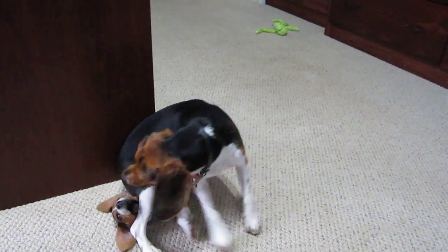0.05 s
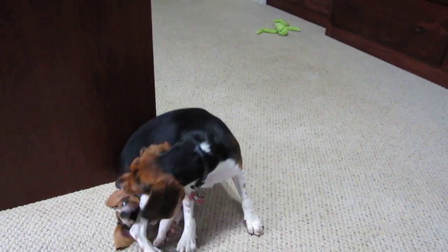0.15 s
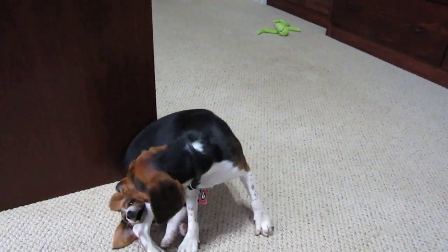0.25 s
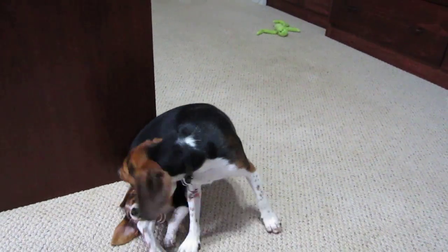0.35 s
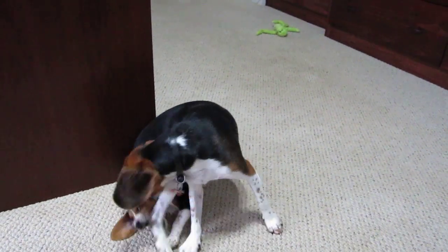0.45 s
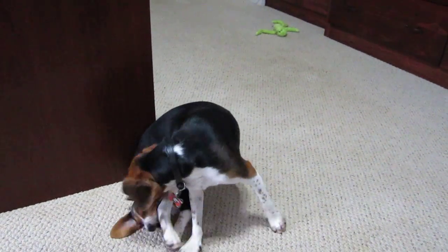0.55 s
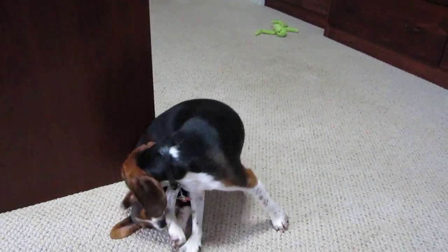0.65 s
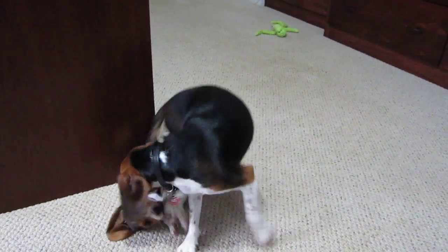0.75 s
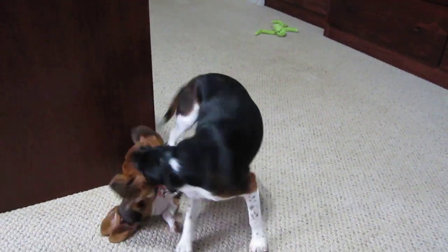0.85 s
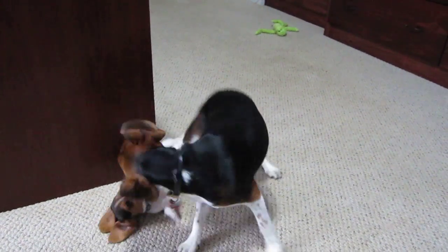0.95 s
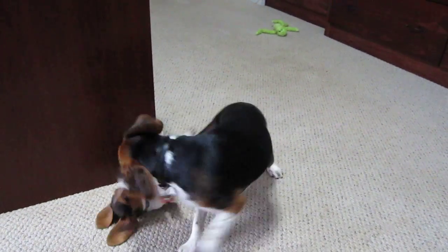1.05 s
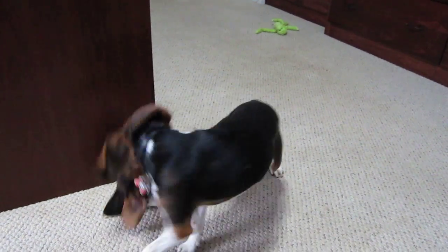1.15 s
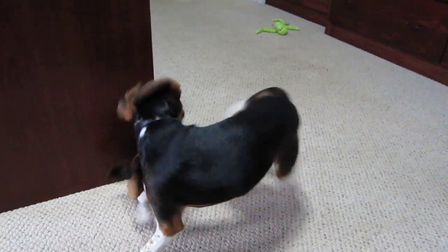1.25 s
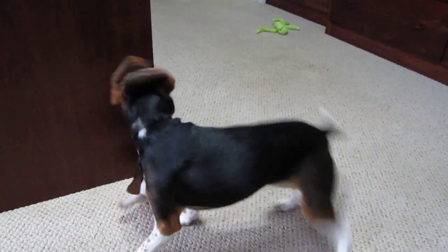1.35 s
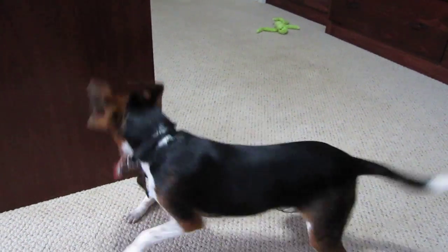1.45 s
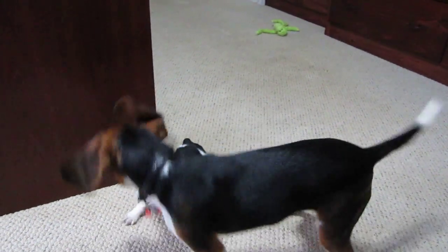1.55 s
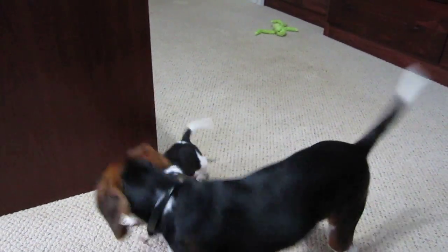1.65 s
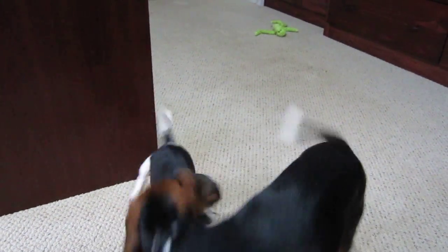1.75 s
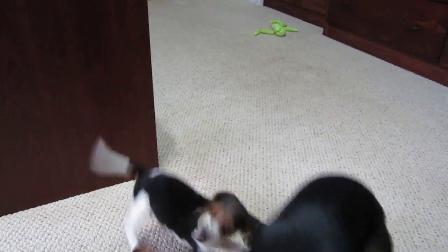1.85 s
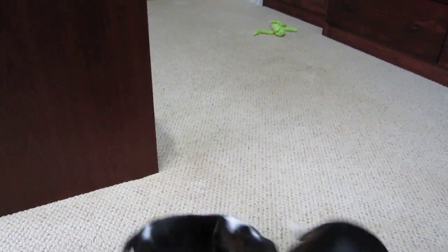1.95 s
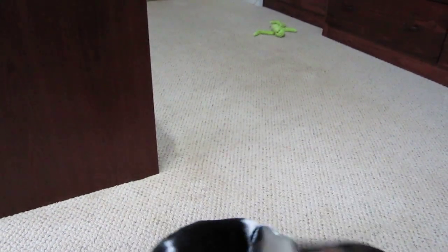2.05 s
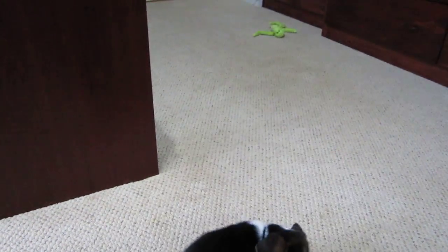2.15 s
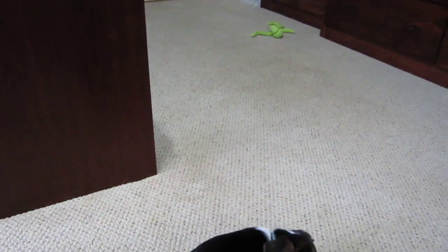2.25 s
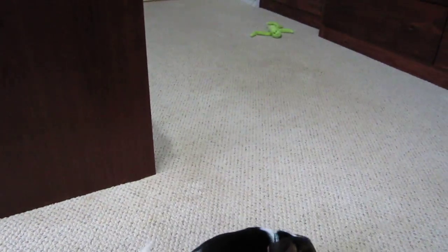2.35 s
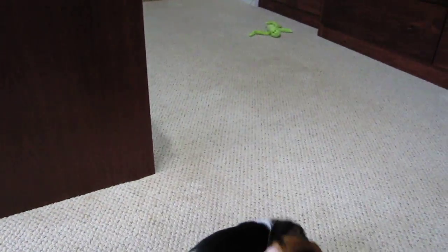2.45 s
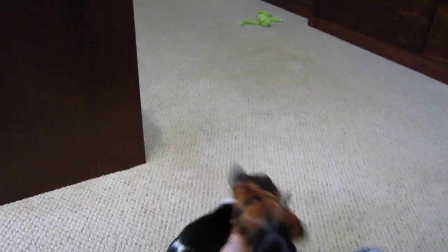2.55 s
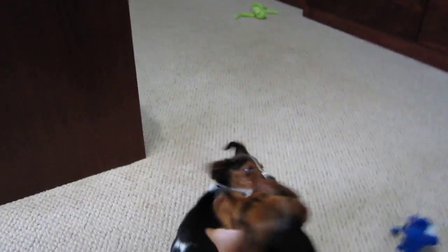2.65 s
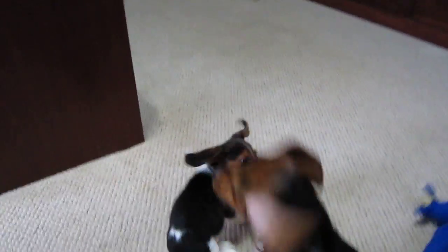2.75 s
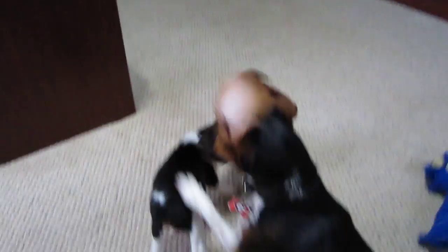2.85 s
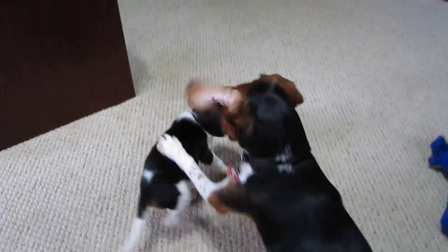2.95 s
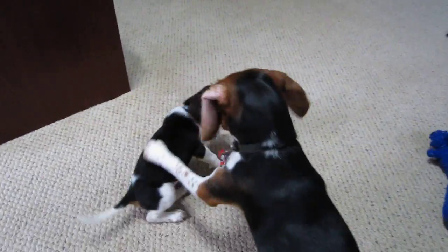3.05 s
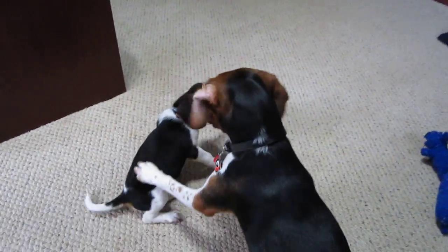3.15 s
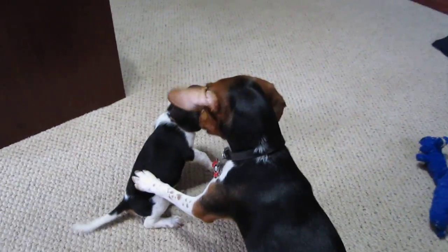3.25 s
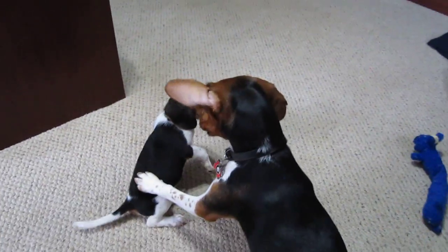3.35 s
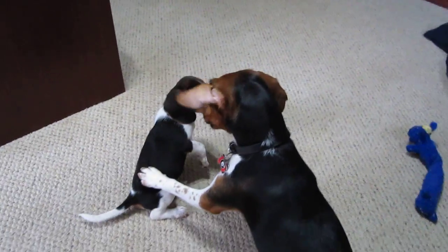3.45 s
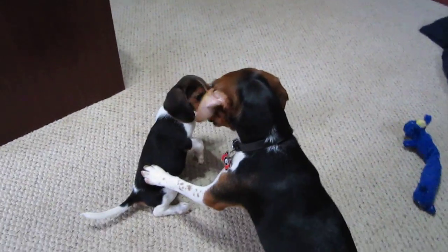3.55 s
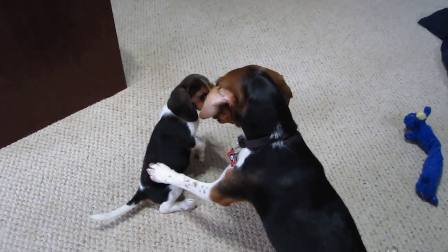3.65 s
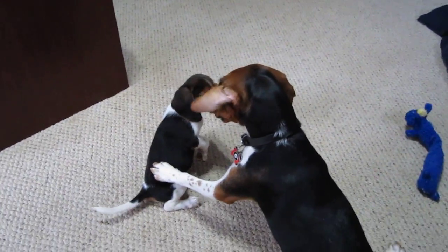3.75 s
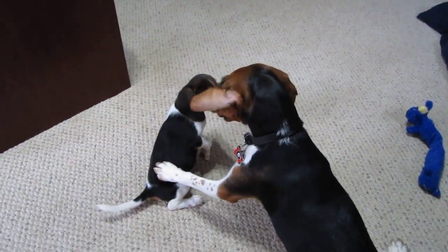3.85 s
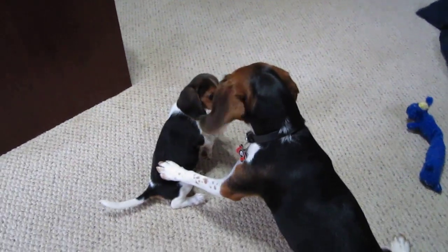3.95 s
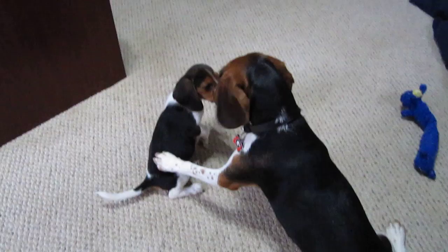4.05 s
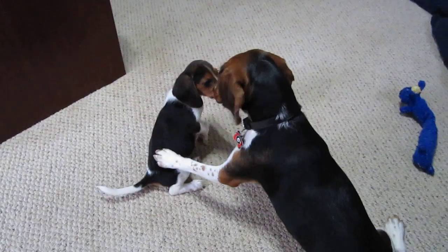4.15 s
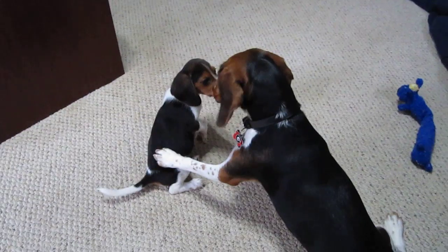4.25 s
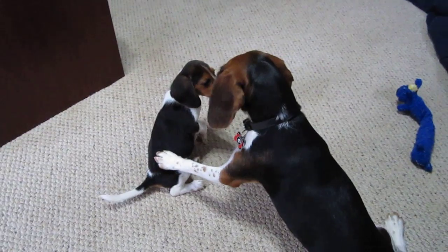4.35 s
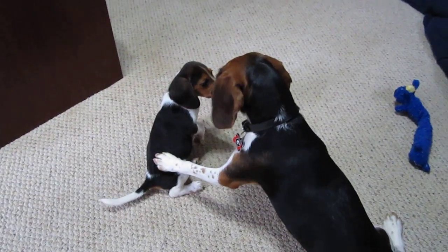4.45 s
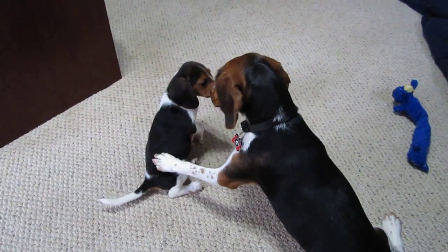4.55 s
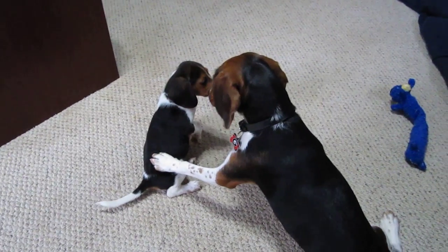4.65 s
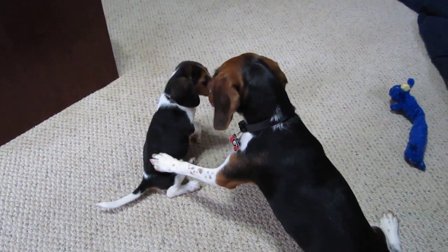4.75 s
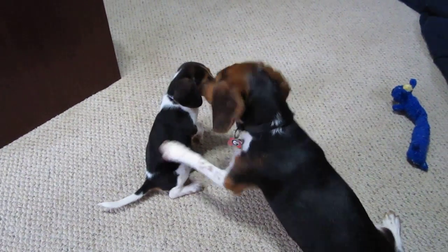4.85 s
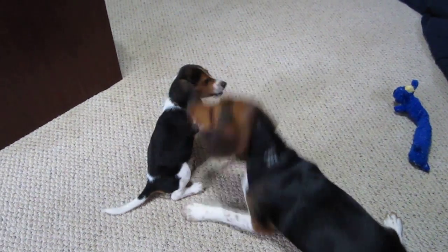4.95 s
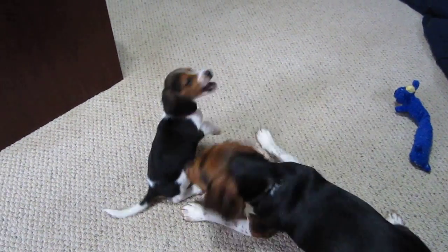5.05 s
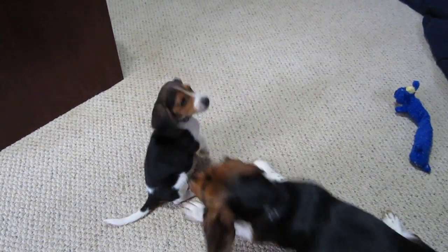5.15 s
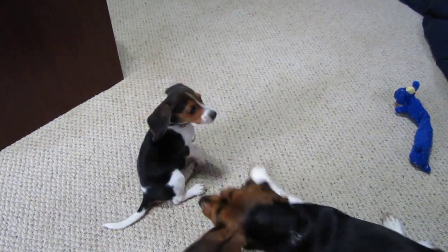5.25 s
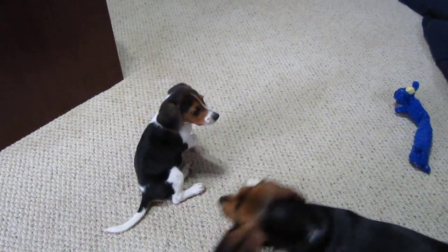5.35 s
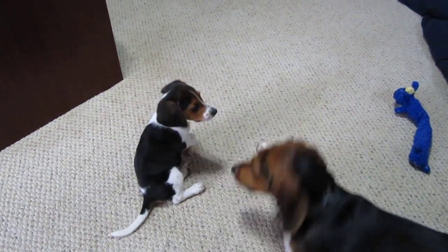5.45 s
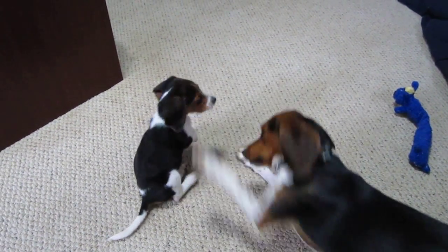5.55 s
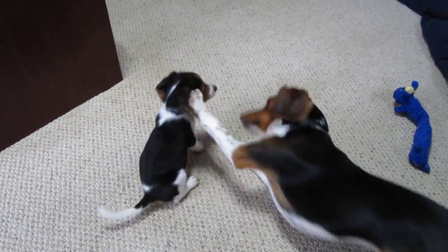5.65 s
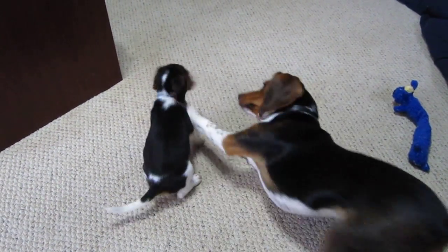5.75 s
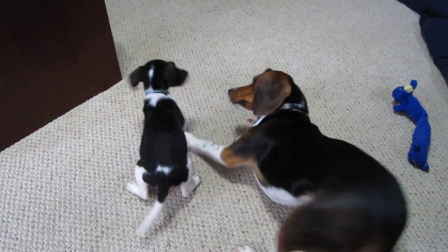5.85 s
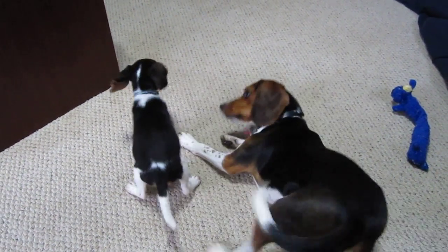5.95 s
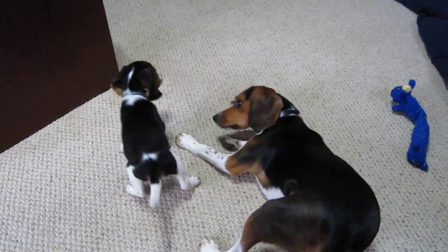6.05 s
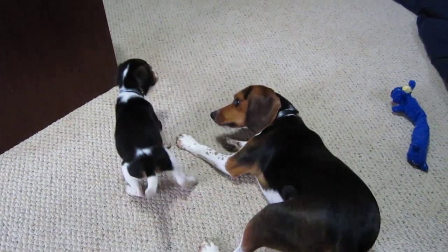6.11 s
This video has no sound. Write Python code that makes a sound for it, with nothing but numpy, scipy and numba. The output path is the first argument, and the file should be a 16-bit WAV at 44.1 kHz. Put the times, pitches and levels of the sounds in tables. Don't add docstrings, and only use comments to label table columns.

```python
import sys
import numpy as np
from scipy import signal
from scipy.fft import rfft, irfft, next_fast_len
from scipy.io import wavfile
from scipy.ndimage import uniform_filter1d, map_coordinates
from numba import njit

SR = 44100
rng = np.random.default_rng(int(sys.argv[2]) if len(sys.argv) > 2 else 0)


def int16_out(signal):
    q = np.round(np.clip(np.atleast_2d(signal).T, -1, 1) * 32767)
    wavfile.write(sys.argv[1], SR, q.astype(np.int16))


def rack_gain(trim_db):
    fader = np.asarray(trim_db, float)
    return 10 ** (fader / 20)


N = 272538
TOP_HZ = 16300
FULL_DB = -13


def even_out(x, span_s=0.045):
    return x / np.sqrt(np.abs(uniform_filter1d(x ** 2, int(span_s * SR))) + 1e-12)


def along(points, hz):
    f, v = np.transpose(points)
    return np.interp(np.log(hz + 1), np.log(f + 1), v)


def played(rows):
    s, *cols = np.transpose(rows)
    t = np.arange(max(round(s[0] * SR), 0), min(round(s[-1] * SR), N)) / SR
    fade = np.clip(np.minimum(t - s[0], s[-1] - t) / .002, 0, 1)
    curves = [uniform_filter1d(np.interp(t, s, c), size=130) for c in cols]
    return round(t[0] * SR), fade, curves


def wobble(n, rate):
    knots = rng.standard_normal(int(n * rate / SR) + 4)
    return map_coordinates(knots, [np.arange(n) * rate / SR])


def noise(n, spectrum):
    m = next_fast_len(n + 2048)
    colour = rack_gain(along(spectrum, np.fft.rfftfreq(m, 1 / SR)))
    x = irfft(rfft(rng.standard_normal(m)) * colour, m)[:n]
    return x / x.std()


def mix_in(out, at, x):
    out[at:at + len(x)] += x[:len(out) - at]


def swell(peak, rise, fall, db):
    low_db = db - 30
    at, fade, (db,) = played([(peak - abs(rise), low_db), (peak, db), (peak + abs(fall), low_db)])
    return at, fade * rack_gain(db)


def swells(rows):
    out = np.zeros(N)
    for row in rows:
        mix_in(out, *swell(*row))
    return out


@njit
def resonate(x, turn, radius):
    y = np.zeros(len(x))
    for i in range(2, len(x)):
        y[i] = x[i] - x[i - 2] + 2 * radius * turn[i] * y[i - 1] - radius * radius * y[i - 2]
    return y


def formant(x, hz, width_hz):
    turn = np.cos(2 * np.pi * hz / SR) * np.ones(len(x))
    radius = np.exp(-np.pi * width_hz / SR)
    for _ in range(3):
        x = resonate(x, turn, radius)
    return even_out(x)


def throat(source, *modes):
    return sum(rack_gain(db) * formant(source, hz, width_hz) for hz, width_hz, db in modes)


def folds(n, rate, jitter, scatter_db, air):
    cycle = np.cumsum(rate * (1 + jitter * wobble(n, 120))) / SR
    clap = np.diff(np.floor(cycle), prepend=0) * rack_gain(scatter_db * wobble(n, 150))
    puff = np.exp(-2.5 * (cycle % 1)) * rng.standard_normal(n)
    return even_out(clap, 0.24) + air * even_out(puff)


# frequency in Hz, level in dB per Hz.
HISS_COLOUR = [(15, -28), (25, 3.5), (416, -7.5), (863, -8.5), (1160, -10), (1650, -13.5), (8590, -24),
               (16000, -40)]
# start in seconds, room tone level in dB.
GAIN_DROPS = [(0, -57), (2.249, -61.5), (2.7, -65.5), (5.398, -69.5)]


def room_tone():
    creep_db_per_s = 4.5
    s, db = np.transpose(GAIN_DROPS)
    t = np.arange(N) / SR
    last = np.maximum(np.searchsorted(s, t, "right") - 1, 0)
    breathing_db = uniform_filter1d(db[last] + creep_db_per_s * (t - s[last]), size=3000)
    return rack_gain(breathing_db - 5.5 + 0.48 * wobble(N, 2.2)) * noise(N, HISS_COLOUR)


def patchy(x, depth_db):
    z = signal.stft(x, nperseg=512)[2]
    field = uniform_filter1d(rng.standard_normal(z.shape), size=8, axis=0)
    field = uniform_filter1d(field, size=12, axis=1)
    return signal.istft(z * rack_gain(depth_db * field / field.std()), nperseg=512)[1][:len(x)]


# peak in seconds, rise in seconds, fall in seconds,
# rub level in dB, hiss in dB over the rub.
SCUFFS = [(0, 0.061, 0.19, -49.5, -11.5), (.3, 0.44, 0.93, -55, 4), (.522, 1, 1, -43.5, -12),
          (.958, 0.088, 0.14, -48, -4.5), (1.074, 0.017, 0.23, -37, -17), (1.2, 0.43, 0.09, -61.5, -14),
          (1.399, 0.17, 0.073, -43, -10), (1.508, 0.034, 0.12, -30.5, -8), (1.57, 0.18, 0.18, -38, -19.5),
          (1.681, 0.096, 1, -49, -13), (1.83, 0.099, 0.22, -44, -17.5), (1.95, 0.17, 0.17, -48.5, 0.5),
          (2.08, 0.087, 0.11, -46, 2), (2.551, 0.096, 0.25, -60.5, 4), (4.872, 0.094, 0.38, -60.5, 1),
          (5.248, 0.045, 0.24, -42, -6), (5.926, 0.081, 0.35, -60.5, -4.5)]
# peak, rise and fall in seconds, level in dB.
FLOOR_BOOMS = [(.2, 0.88, 0.77, -57.5), (.45, 1, 0.44, -41), (.94, 0.175, 0.99, -39.5),
               (1.34, 0.052, 1, -38.5), (1.8, 0.049, 0.16, -43.5), (2.012, 0.4, 0.13, -45.5),
               (2.45, 0.88, 0.76, -71), (2.694, 0.923, 0.24, -61.5), (4.858, 0.0603, 0.28, -46.5),
               (5.4, 0.6, 1, -66.5), (5.95, 0.91, 0.23, -68)]


def scuffle():
    boom = noise(N, [(20, -14.0), (45, -12.0), (70, -2.5), (130, -4.5), (250, -17.5), (500, -90.0)])
    rub = noise(N, [(1500, -55.5), (2800, -0.5), (3500, -3.5), (4900, -1.0), (6500, -22.5), (9000, -79.0)])
    hiss = noise(N, [(3500, -58.0), (5500, 4.5), (8000, -5.5), (12000, -13.5), (16000, -22.5)])
    grains = rack_gain(2 * wobble(N, 250) + wobble(N, 40))
    rub_gain = swells((s, rise, fall, db - 9.0) for s, rise, fall, db, _ in SCUFFS)
    hiss_gain = swells((s, rise, fall, db + over_db - 5.5) for s, rise, fall, db, over_db in SCUFFS)
    drag = patchy(rub_gain * rub + hiss_gain * hiss, depth_db=5.0)
    return swells(FLOOR_BOOMS) * boom + grains * drag


# peak in seconds, fall in seconds, level in dB, mouth resonance in Hz,
# chest level in dB.
GRUNTS = [(.005, 0.096, -38.5, 980, -16), (.045, 0.17, -42, 1020, -12), (.958, 0.3, -41, 1060, -26),
          (1.062, .1, -38.5, 1187, 5), (1.08, 0.11, -31.5, 1255, 3), (1.14, 0.12, -34.5, 960, 10.5),
          (1.175, .2, -37.5, 1185, 9.5), (1.37, 1, -54, 1115, 15.5), (1.434, 0.038, -45, 1100, -14),
          (1.533, 0.11, -41.5, 1466, 6), (1.576, .1, -51, 1200, 12.5), (1.655, 0.16, -32.5, 1160, -2),
          (1.715, .14, -39, 1185, 4), (1.783, 0.19, -48, 1161, 7)]


def grunts():
    climb = .12
    out = np.zeros(N)
    for s, fall, db, hz, chest_db in GRUNTS:
        at, gain = swell(s, .028, fall, db)
        mouth_hz = hz * np.linspace(1 - climb / 2, 1 + climb, len(gain))
        claps = folds(len(gain), 105, jitter=0.13, scatter_db=2.0, air=1.7)
        chest, neck = (220, 150, chest_db), (560, 400, -4.5 + chest_db / 2)
        voice = throat(claps, chest, neck, (mouth_hz, 340, 0), (mouth_hz * 1.28, 260, -4))
        mix_in(out, at, gain * voice)
    return out


# peak, rise and fall in seconds, level in dB.
SNORTS_AND_RUSTLES = [(.01, 0.039, 0.42, -54.5), (.97, 0.28, 0.57, -46), (1.41, 0.021, 0.11, -47.5),
                      (1.495, 0.017, 0.08, -32), (1.53, 0.095, 0.12, -34), (1.575, 0.1, 0.058, -43),
                      (2.414, 0.033, 0.12, -58.5), (3.56, 0.45, 0.55, -70.5), (4.872, 0.029, 0.0315, -34.5),
                      (5.95, 0.16, 0.19, -64.5)]
# frequency in Hz, level in dB per Hz.
NOSE_COLOUR = [(290, -43), (500, -25.5), (831, -16.5), (1450, -4), (1910, -3.5), (2350, -3), (3300, -14.5),
               (5620, -23.5), (9000, -41.5), (11700, -69), (19800, -120)]
# peak in seconds, fall
# in seconds, pitch in Hz, level in dB.
WHISTLES = [(4.845, .024, 4980, -53), (4.928, .012, 13750, -65.5), (4.942, 0.015, 14300, -56),
            (5.911, 0.059, 5118, -44.5)]


def nose():
    out = swells(SNORTS_AND_RUSTLES) * rack_gain(2 + 2 * wobble(N, 90)) * noise(N, NOSE_COLOUR)
    for s, fall, hz, db in WHISTLES:
        at, gain = swell(s, 0.028, fall, db)
        n = len(gain)
        flutter = rack_gain(2.3 * wobble(n, 73))
        phase = 2 * np.pi * np.cumsum(hz * (1 + 0.015 * wobble(n, 89))) / SR
        mix_in(out, at, gain * flutter * np.sin(phase))
    return out


# start in seconds, click level in dB, large tag level in dB,
# small tag level in dB, lean towards the small tag's second mode in dB.
CHINKS = [(0.013, -31, -43.5, -48, 12), (0.0468, -46, -53, -47, 3.5), (0.9595, -36, -48.5, -65.5, 10.5),
          (1.294, -36, -84, -58, 0), (1.337, -40, -75.5, -45, -7), (1.371, -42, -81.5, -73, 0.5),
          (1.378, -38, -81, -41.5, -4), (1.4024, -53.5, -75.5, -53.5, -6), (1.4598, -41.5, -32, -38, 3),
          (1.6335, -38.5, -63, -58.5, 2), (1.6603, -32.5, -62, -64, 0), (1.723, -34.5, -64.5, -44, -5),
          (1.7637, -32, -57, -40.5, -3), (1.821, -45.5, -78, -56.5, -3), (2.7729, -47.5, -89, -74, -3),
          (2.8138, -52, -76.5, -55.5, 1), (2.868, -50, -83, -86, 2), (2.877, -47, -58, -59, 1),
          (2.908, -54.5, -79, -75, 4), (4.9977, -67.5, -58.5, -62.5, 11.5), (5.0446, -46, -68.5, -53.5, 3),
          (5.058, -58.5, -85, -74, 13), (5.1894, -55.5, -59, -63.5, -5), (5.443, -58, -81, -84, -7),
          (6.0765, -61.5, -84.5, -85.5, -6.5)]
# frequency in Hz, t60 in seconds.
TAG_MODES = [(3655, .22), (8285, .07), (9965, .2), (11520, .17), (14660, .18)]
# start in seconds, level in dB.
COLLAR_RING = [(.0134, -47), (1.4598, -53), (2.8137, -67.5)]


def tags():
    first_mode_db, waver_rad = -9, .9
    ring_hz, ring_t60_s = 3350, .25
    out, t = np.zeros(N), np.arange(SR // 3) / SR
    n = len(t)
    click_colour = [(2500, -27.5), (5000, 1.5), (7000, 4.5), (12000, -10), (16000, -9.5)]
    for s, click_db, large_db, small_db, lean_db in CHINKS:
        away_db = small_db - lean_db
        mode_db = [large_db, away_db + first_mode_db, small_db + lean_db, away_db, away_db - 13.5]
        swing = rack_gain(2.2 * wobble(n, 60))
        ring = np.zeros(n)
        for (hz, t60), db in zip(TAG_MODES, mode_db):
            waver = waver_rad * (hz > 5000) * wobble(n, 89)
            ring += rack_gain(db + 3.0 - 60 * t / t60) * np.sin(2 * np.pi * hz * t + waver)
        click = rack_gain(click_db - 60 * t / 0.016) * (1 - np.exp(-t / 0.0014)) * noise(n, click_colour)
        mix_in(out, round(s * SR), swing * ring + click)
    for s, db in COLLAR_RING:
        decay = rack_gain(db - 60 * t / ring_t60_s + 2 * wobble(n, 60))
        mix_in(out, round(s * SR), decay * np.sin(2 * np.pi * ring_hz * t))
    return out


# start in seconds, level in dB, sag in dB until the next,
# second over third partial in dB, strain in dB.
GROWL_SURGES = [(.172, -32.5, -4, 6.5, -18), (0.213, -35, -1, -3.5, -14.5), (0.263, -30, 2.5, -6, -9),
                (0.339, -26.5, 2, -1, -16), (0.428, -22.5, 1.5, 3.5, -27), (.438, -28, 1, 12, -9),
                (0.532, -22, 5, 5, -6.5), (0.584, -28.5, 2, 5.5, -14), (0.641, -35, 1.5, 6, -13.5),
                (0.714, -36.5, -6, 6, -9.5), (0.788, -30, 14, 1, -14)]


def surges():
    ends = [row[0] for row in GROWL_SURGES[1:]] + [0.883]
    first = GROWL_SURGES[0]
    rows = [(first[0], first[1] - 18, *first[3:])]
    for (s, db, sag_db, lean_db, strain_db), end in zip(GROWL_SURGES, ends):
        rows.append((s + 0.0026, db, lean_db, strain_db))
        rows.append((end, db - sag_db, lean_db, strain_db))
    return played(rows)


# time in seconds, resonance in Hz, opening in dB, unevenness from 0 to 1.
GROWL_JAW = [(.17, 1034, 4, 0.1), (.23, 1060, 5, 0.01), (.3, 1030, 8.5, 0.01), (.33, 1060, 6, .07),
             (.4, 1122, 6.5, 0.04), (.47, 1060, -9.5, 0.06), (.56, 984, -1.5, .05),
             (.66, 969.6, -7.5, 0.01), (.76, 1098, 0.5, 0.02), (.88, 925, -3.5, .07)]
# time in seconds, clap rate in Hz.
GROWL_RATE = [(0.169, 97.1), (0.189, 92.7), (.26, 86.9), (0.391, 96.72), (0.484, 105.8), (0.541, 110.1),
              (0.707, 99.76), (0.792, 95.95), (0.874, 79.4)]


def long_growl():
    at, fade, (db, lean_db, strain_db) = surges()
    n, out = len(fade), np.zeros(N)
    hz = np.interp((at + np.arange(n)) / SR, *np.transpose(GROWL_RATE))
    phase = 2 * np.pi * np.cumsum(hz * (1 + 0.018 * wobble(n, 60))) / SR
    second = rack_gain(db + lean_db + 0.46 + 1.5 * wobble(n, 70)) * np.sin(2 * phase)
    third = rack_gain(db - lean_db + 0.46 + 2.5 * wobble(n, 90)) * np.sin(3 * phase)
    jaw_hz, open_db, uneven = (np.resize(c, n) for c in played(GROWL_JAW)[2])
    claps = folds(n, hz, jitter=uneven, scatter_db=3, air=6 * uneven)
    loose = folds(n, hz, jitter=.06, scatter_db=3.5, air=.9)
    breathy = folds(n, hz, jitter=.16, scatter_db=3.5, air=3.5)
    closing = np.linspace(0, 1, n)
    neck = throat(loose, (360, 200, db - 13 + 8 * closing), (620, 170, db - 13.0 + 9 * closing),
                  (830, 240, db - 10.0 + 3 * closing))
    mouth = throat(claps, (jaw_hz, 200, db + open_db))
    upper_db = db + strain_db
    rasp_air = throat(breathy, (2300, 900, upper_db), (1550, 700, db - 14.5), (3700, 1400, upper_db - 14.0))
    mix_in(out, at, fade * (np.sqrt(2) * (second + third) + neck + mouth + rasp_air))
    return out


# start in seconds, peak level in dB, pitch in Hz.
PAW_THUMPS = [(0.956, -27.5, 72.5), (1.355, -27, 66.4), (1.384, -39, 70.5), (1.778, -32, 213),
              (1.951, -23, 245.5), (2.679, -47, 251), (4.857, -31, 324), (4.977, -38, 147.6),
              (5.957, -51.5, 306.4)]


def thumps():
    out, t = np.zeros(N), np.arange(SR // 5) / SR
    puff_colour = [(60, -8.0), (300, 1.5), (900, -12.0), (3000, -44.5)]
    for s, db, hz in PAW_THUMPS:
        puff = 0.7 * noise(len(t), puff_colour) * rack_gain(-60 * t / 0.18)
        swing = rack_gain(-60 * t / 0.2) * np.sin(2 * np.pi * hz * t)
        mix_in(out, round(s * SR), rack_gain(db) * (1 - np.exp(-t / 0.0013)) * (swing + puff))
    return out


def partials(hz, level_db, brighter, mouth_hz, width_hz, upper_hz, upper_db):
    f = hz * np.arange(1, 5)[:, None]
    leak = rack_gain(-58)
    upper = rack_gain(upper_db) / (1 + ((f - upper_hz) / 450) ** 2) + leak
    lower = 1 / (1 + ((f - mouth_hz) / width_hz) ** 4)
    gain = lower + upper * rack_gain(brighter * (level_db - FULL_DB))
    return level_db + 20 * np.log10(gain / np.linalg.norm(gain, axis=0))


# time in seconds, pitch in Hz, level in dB, roughness from 0 to 1.
BARKS = [
    [(1.827, 480, -25.5, 0), (1.833, 501, -14.5, 0.08), (1.842, 507, -27, 0.24), (1.847, 500, -8.5, 0.1),
     (1.854, 492, -13, 0.14), (1.867, 464, -16, 0.05), (1.874, 442, -24, 0.1), (1.905, 390, -30.5, 0.4)],
    [(2.028, 274, -34, 0.38), (2.038, 279.3, -20.5, 0.16), (2.07, 276.7, -31, 0.3),
     (2.105, 292.6, -19.5, 0.2)],
    [(5.14, 213.5, -49, 0), (5.194, 332.6, -44, 0.31), (5.225, 414.8, -45, 0.4)],
    [(5.29, 628.2, -26, 0.07), (5.365, 614.6, -16, 0.03), (5.425, 602, -12, 0.03), (5.47, 592, -14.5, 0),
     (5.5, 586.6, -17, 0), (5.535, 579.2, -26.5, 0), (5.572, 542.6, -23, 0), (5.595, 315.3, -40.5, 0.17),
     (5.615, 230, -30.5, 0.24)],
    [(5.605, 258.6, -54, 0.2), (5.63, 200, -48.5, 0.31), (5.66, 169, -47, 0.08), (5.69, 138, -53, 0.3)],
]
# time in seconds, pitch in Hz, level in dB, roughness from 0 to 1.
YIPS = [
    [(2.102, 539, -21.5, 0.2), (2.114, 592, -10.5, 0.07), (2.13, 665, -15, 0.01), (2.15, 674.7, -14, 0),
     (2.17, 685.4, -16.5, 0.05), (2.19, 682, -26.5, 0.14), (2.2, 660, -32.5, 0.2), (2.21, 637, -43, 0.2)],
    [(2.502, 863, -31.5, 0), (2.508, 876, -23, 0.05), (2.521, 941, -21.5, 0.1), (2.539, 1109, -15.5, 0.26),
     (2.544, 1343, -15, 0.19), (2.557, 1305, -17.5, 0.12), (2.567, 891, -16.5, 0.08),
     (2.594, 632, -13.5, 0.09), (2.612, 410, -24, 0.44)],
    [(4.867, 1386, -23, 0), (4.873, 1403, -12, 0.02), (4.885, 1444, -13, .04), (4.9, 1459, -12, 0.06),
     (4.917, 1472, -15, 0.03), (4.935, 1444, -30.5, 0.14)],
]
# mouth resonance in Hz, its width in Hz,
# upper resonance in Hz, upper level in dB.
CALL_MOUTHS = [(950, 307, 2200, -16), (283.4, 300, 650, -8.5), (270, 42.5, 1200, -10.5),
               (698.7, 96.6, 1910, -26.5), (200, 72, 970, 8), (637.7, 418, 2450, -14),
               (1060, 329, 2280, -7.5), (1450, 190, 2900, -19)]
# dB the top gains per dB of effort, dB lost from partial
# to partial past the second, high partials in dB, share of claps skipped while the pitch climbs.
CALL_VOICES = [(0.15, 2, 12.5, .12), (-1.5, 0.5, 1.5, 0.11), (0.5, 3, -9, .12), (0.14, 5, -2, 0.17),
               (0, -5, 0, .12), (1.1, 1, 8, .12), (0, 18, 7.5, 0.75), (4, 4, 10, .12)]
# frequency in Hz, dB relative to the call's level.
HIGH_PARTIALS = [(3600, -63), (5200, -52.5), (6200, -64.5), (7300, -52.5), (12000, -73)]


def barks_and_yips():
    slope_db = -11
    out = np.zeros(N)
    for rows, mouth, (brighter, loss_db, high_db, skipped) in zip(BARKS + YIPS, CALL_MOUTHS, CALL_VOICES):
        at, fade, (hz, level_db, rough) = played(rows)
        n = len(hz)
        phase = 2 * np.pi * np.cumsum(hz * (1 + (.0015 + .12 * rough) * wobble(n, 150))) / SR
        glide = np.gradient(hz)
        strain_db = np.clip(np.abs(np.gradient(np.log(hz))) * SR * 2.5, 0, 25)
        falling_db = uniform_filter1d(strain_db * (glide < 0), size=260)
        db = list(partials(hz, level_db, brighter, *mouth))
        db[1] = db[1] - .5 * falling_db * np.clip(hz / 150 - 3.4, 0, 1)
        for k in (3, 4):
            db[k - 1] = db[k - 1] - falling_db * np.clip(k * hz / 400 - 3.8, 0, 1) - loss_db * (k - 2)
        effort_db = np.minimum(brighter * (level_db - FULL_DB), 12)
        for k in range(5, 19):
            thinning_db = db[3] + slope_db * np.log2(k - 3)
            past_db = level_db + high_db + effort_db + along(HIGH_PARTIALS, k * hz) - strain_db
            db.append(np.where(k * hz < 3550, thinning_db, past_db) + 4.4 * wobble(n, 40))
        climbing = uniform_filter1d(1. * (glide > 0), size=200)
        smear = 1 + rough * (wobble(n, 380) + skipped * climbing * np.sin(phase / 2))
        tone = sum(rack_gain(d) * np.sin(k * phase + k - 1) * (k * hz < TOP_HZ) for k, d in enumerate(db, 1))
        mix_in(out, at, np.sqrt(2) * fade * smear * tone)
    return out


# peak in seconds, fall in seconds, resonance in Hz, level in dB.
HOARSE_PUFFS = [(1.846, 0.044, 2520, -25), (2.114, 0.128, 2414, -24), (2.185, 0.085, 2237, -28),
                (2.547, 0.2, 2441, -29), (2.581, 0.095, 1506, -33.5), (5.567, 0.15, 2790, -58),
                (5.575, 0.2, 1510, -52)]


def hoarse_air():
    out = np.zeros(N)
    for s, fall, hz, db in HOARSE_PUFFS:
        at, gain = swell(s, 0.014, fall, db)
        air = folds(len(gain), 600, jitter=0.073, scatter_db=-0.5, air=6.0)
        mix_in(out, at, gain * throat(air, (hz * 1.05, 380, -5), (hz * .7, 700, -9), (3600, 900, -21)))
    return out


# time in seconds, mouth resonance in Hz, effort in dB.
SNARL_PATH = [(1.87, 873, -30.5), (1.91, 875, -38), (1.922, 1019, -23), (1.961, 946, -17),
              (1.978, 787, -22.5), (2.03, 841, -24), (2.042, 654, -25), (2.1, 620, -31), (2.11, 640, -27)]


def snarl():
    out = np.zeros(N)
    at, fade, (hz, db) = played(SNARL_PATH)
    claps = folds(len(hz), np.linspace(250, 215, len(hz)), jitter=.045, scatter_db=2, air=.6)
    mouth, upper = (hz, 520, db), (np.maximum(2.1 * hz, 1500), 350, db - 9.5)
    teeth, chest = [(2750, 700, db - 23.0), (3500, 900, db - 23.5)], (280, 250, db - 16.0)
    mix_in(out, at, fade * throat(claps, mouth, upper, *teeth, chest))
    return out


# start in seconds, peak level in dB, pitch in Hz.
SMACKS_AND_PUFFS = [(2.8798, -52, 1600), (2.9058, -48.5, 1650), (4.0164, -54, 1307), (4.915, -53.5, 7350),
                    (5.27, -49.5, 240), (5.315, -45.5, 235), (5.357, -47.5, 241.7), (5.412, -47, 260.7),
                    (5.443, -49.5, 259.6), (5.512, -50.5, 240), (5.548, -50.5, 217), (5.845, -56.5, 301)]


def smacks():
    out, t = np.zeros(N), np.arange(SR // 5) / SR
    for s, db, hz in SMACKS_AND_PUFFS:
        colour = [(hz * 0.069, -40), (hz * 0.67, -5), (hz, 0), (hz * 1.3, -8), (hz * 3, -35)]
        mix_in(out, round(s * SR), rack_gain(db - 3.0 - 60 * t / 0.071) * noise(len(t), colour))
    return out


# time in seconds, level in dB.
RASP_EFFORT = [(5.212, -50.5), (5.228, -32), (5.25, -19.5), (5.297, -20.5), (5.361, -21.5), (5.385, -35)]
# level at
# the start in dB, extra sag in dB per second.
RASP_THROAT = [(1, 8), (3.5, 93.5), (2.5, 152.5), (-8.5, 152.5)]


def rasp():
    out = np.zeros(N)
    at, fade, (effort_db,) = played(RASP_EFFORT)
    n = len(fade)
    t = np.arange(n) / SR
    db = [effort_db + start_db - sag * t for start_db, sag in RASP_THROAT]
    slow = folds(n, 107, jitter=.03, scatter_db=1.5, air=.3)
    fast = folds(n, 542, jitter=.025, scatter_db=3, air=.2)
    breathy = folds(n, 107, jitter=0.032, scatter_db=11.0, air=9.6)
    voice = throat(slow + .6 * fast, (600, 180, db[0]), (1090, 170, db[1]), (1610, 150, db[2] - 3))
    air = throat(breathy, (2050, 450, db[2] - 7.5), (2800, 600, db[3]), (4800, 1500, db[3] - 14.5))
    mix_in(out, at, fade * voice)
    mix_in(out, at, fade * air)
    return out


# frequency in Hz, t60 in seconds.
ROOM_DECAY = [(150, 0.21), (700, 0.37), (2000, 0.4), (3400, .38), (6000, 0.046), (14000, 0.039)]
# frequency in Hz, level in dB.
ROOM_COLOUR = [(250, -10.5), (480, 1), (600, -1.5), (690, -11), (900, 2), (1600, -3), (3000, -1.5)]
# frequency in Hz, level in dB, t60 in seconds.
ROOM_NOTES = [(562, 2, .4), (592, 3, .42), (1290, 5, .45), (1320, 9, .5), (1630, 8, .45), (1740, 7, .45),
              (2640, 7, .4)]


def room(x):
    hz, t, z = signal.stft(rng.standard_normal(SR // 2), SR, nperseg=256)
    decay_db = -60 * t / along(ROOM_DECAY, hz)[:, None]
    tail = signal.istft(z * rack_gain(decay_db + along(ROOM_COLOUR, hz)[:, None]), SR, nperseg=256)[1]
    s = np.arange(len(tail)) / SR
    notes = np.zeros(len(tail))
    for note_hz, db, t60 in ROOM_NOTES:
        unit_gain = 2 * np.log(1000) / (t60 * SR)
        notes += rack_gain(db - 60 * s / t60) * np.sin(2 * np.pi * note_hz * s) * unit_gain
    delayed = np.pad(x, (300, 0))
    return signal.fftconvolve(delayed, tail / np.linalg.norm(tail) + notes)[:N]


def scene():
    voices = grunts() + nose() + long_growl() + barks_and_yips() + hoarse_air() + snarl() + rasp()
    small = tags() + thumps() + smacks()
    reverb = room(rack_gain(-13) * voices + rack_gain(-12) * small)
    return (voices + small + scuffle() + reverb + room_tone())[None]


def low_pass(x):
    return signal.sosfilt(signal.butter(12, 16480, fs=SR, output="sos"), x)


def record(dry):
    kept = irfft(rfft(dry) * (np.fft.rfftfreq(N, 1 / SR) < TOP_HZ), N)
    return low_pass(kept)


dry = scene()
out = record(dry)
int16_out(out)
```